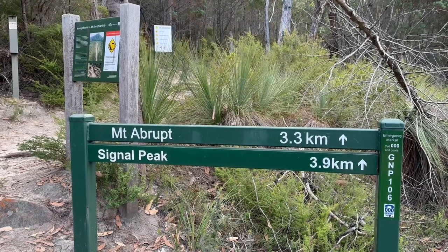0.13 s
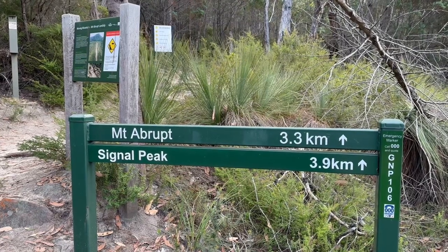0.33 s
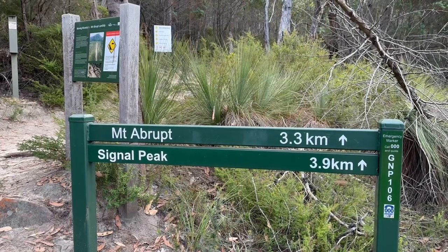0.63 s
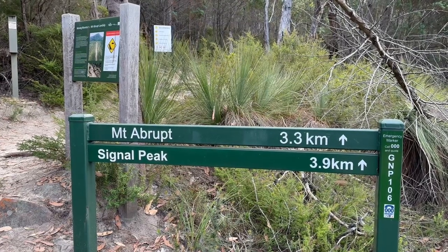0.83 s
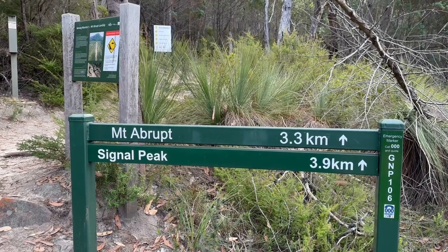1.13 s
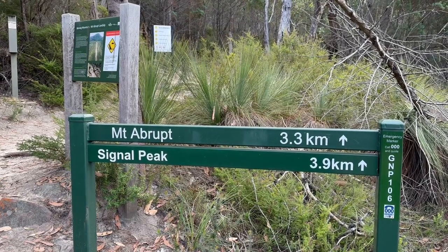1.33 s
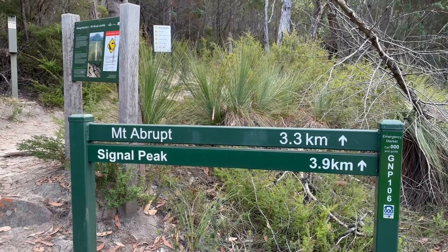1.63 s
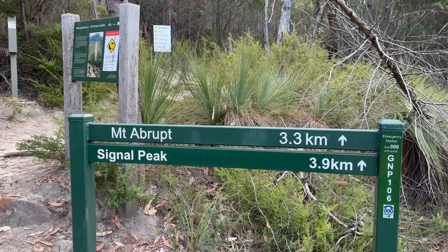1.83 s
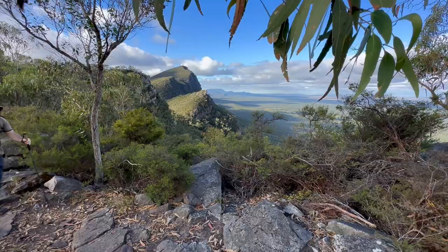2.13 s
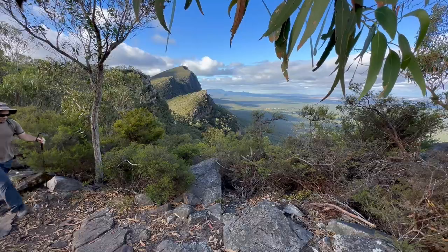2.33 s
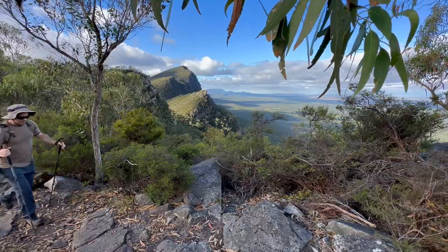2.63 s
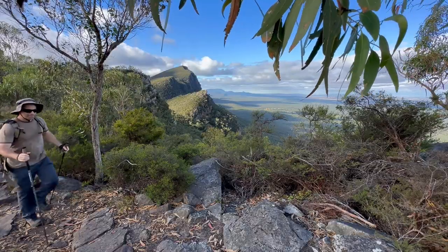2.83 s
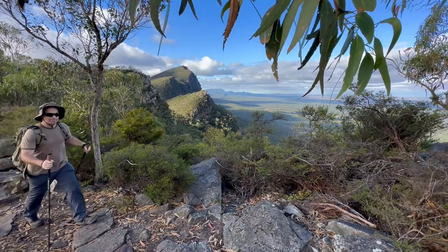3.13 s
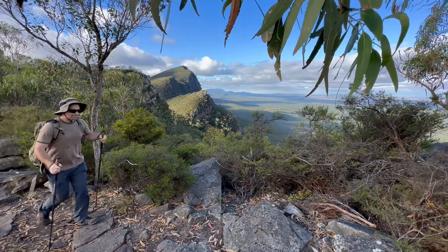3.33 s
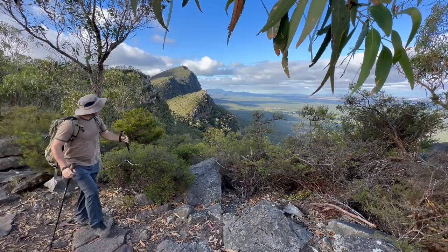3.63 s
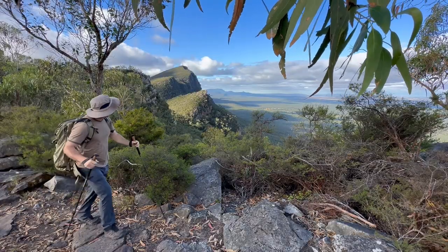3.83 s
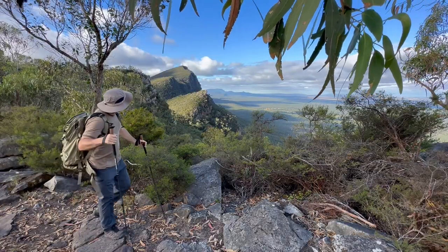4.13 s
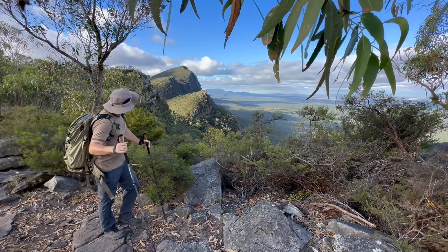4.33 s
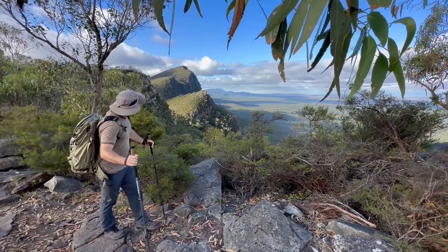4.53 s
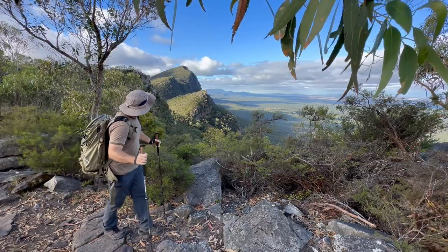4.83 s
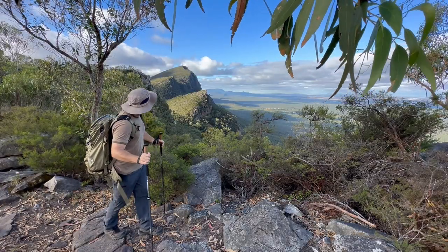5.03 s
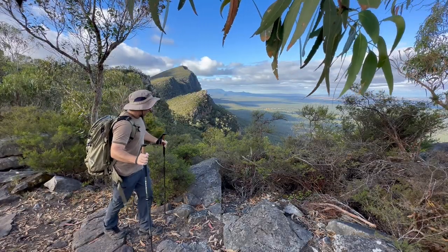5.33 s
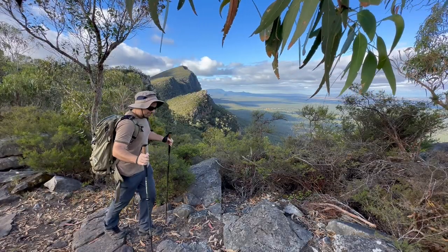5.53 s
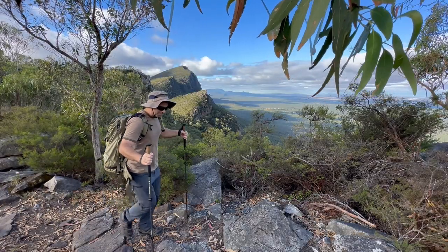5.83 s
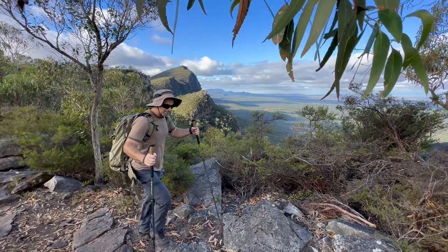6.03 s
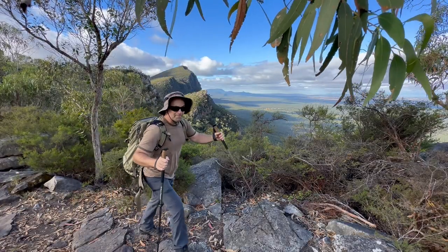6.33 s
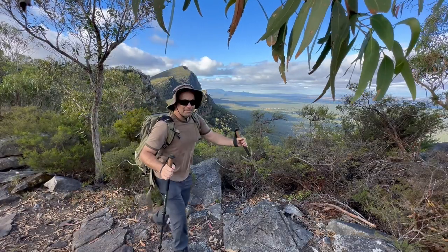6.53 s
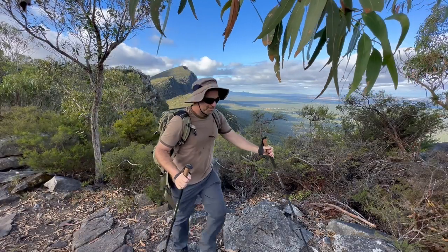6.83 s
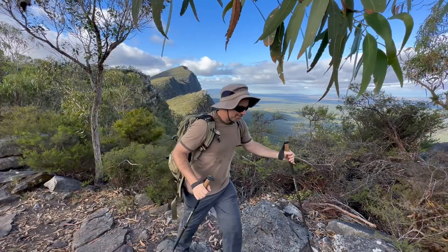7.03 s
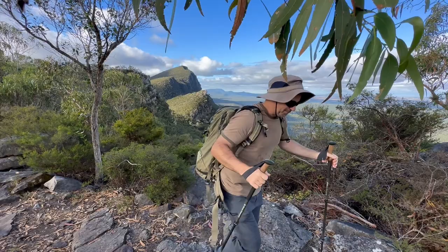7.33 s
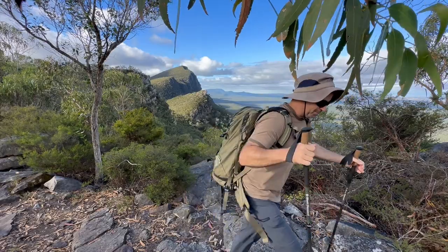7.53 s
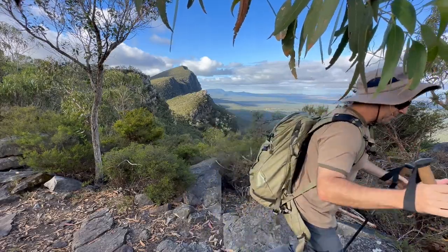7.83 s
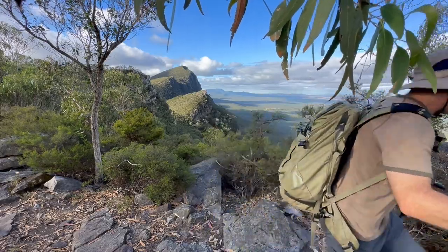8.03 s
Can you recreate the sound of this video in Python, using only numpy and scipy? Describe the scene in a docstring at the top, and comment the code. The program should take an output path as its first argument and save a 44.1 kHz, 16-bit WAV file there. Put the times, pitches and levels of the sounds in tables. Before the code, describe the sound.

Leafy bushland hiss with wind bumps, then a quieter windy ridge where a hiker passes, boots crunching grit and metal pole tips striking stone.

```python
"""Leaves hiss and wind bumps two microphone ports; at 2.21 s the hiss cuts to the quieter air of a rocky ridge.
A hiker passes from left to right: boots thud and scuff on grit, pebbles tick, trousers and pack rustle,
and steel pole tips tap, strike and skitter on the stone. Air, wind, rubbing and grit are shaped noise with
drifting levels; pole shafts and the struck slab are decaying modes; light taps, small stones and snaps
are short band-limited clicks."""
import sys
import numpy as np
from scipy import signal
from scipy.fft import rfft, irfft, next_fast_len
from scipy.io import wavfile
from scipy.ndimage import uniform_filter1d, map_coordinates

SR = 44100
rng = np.random.default_rng(int(sys.argv[2]) if len(sys.argv) > 2 else 0)


def int16_out(signal):
    """Quantize to a 16-bit WAV file."""
    q = np.round(np.clip(np.atleast_2d(signal).T, -1, 1) * 32767)
    wavfile.write(sys.argv[1], SR, q.astype(np.int16))


N = 360297
T = np.arange(N) / SR
TOP_HZ = 15900

# Air: bushland before the cut, ridge after; spectra: f/Hz, density/dB per Hz (relative)
CUT_S = 2.21
BUSH_SPECTRUM = [(25, -20), (75, -6.5), (435, -7), (1310, -18), (2210, -20), (6310, -26.5), (8420, -29.5),
                 (11200, -48.5), (15800, -42)]
RIDGE_SPECTRUM = [(200, -7.5), (720, -7.5), (3000, -13.5), (7600, -17.5), (9000, -14), (11400, -32),
                  (15800, -30)]
# left-right likeness of the air: f/Hz, coherence/1
AIR_COHERENCE = [(180, 0.9), (550, -0.054), (1650, -0.2), (5000, 0.15)]

# breeze swelling to its main crest at 3.87 s, falling, then stirring weakly again: t/s, buffet level/dB
BREEZE = [(0, -76.5), (.82, -65), (1.05, -54), (1.8, -57.5), (2.3, -51), (3.45, -41.5), (3.68, -42.5),
          (3.87, -32.5), (4.08, -37.5), (4.35, -41), (4.88, -56.5), (5.15, -68.5), (5.42, -55), (5.65, -64),
          (6.15, -81), (6.4, -64.5), (7.35, -66.5), (7.55, -74.5), (8.1, -70.5)]
# gusts riding on the breeze: t/s, level/dB
GUSTS = [(.965, -43), (1.19, -48), (1.375, -44), (1.7, -48), (1.94, -48), (2.115, -41), (2.34, -45),
         (4.339, -37), (4.669, -37.5), (4.731, -41.5), (5.291, -55), (5.39, -57), (5.48, -51), (6.235, -65),
         (6.54, -53.5), (6.89, -50), (6.97, -53)]
GUST_S = 0.032  # from crest to 1/e
# wind rumble spectrum: f/Hz, density/dB per Hz (relative)
RUMBLE_SPECTRUM = [(20, -38), (45, 1), (75, 2.5), (130, -7.5), (230, -24), (400, -35.5), (1500, -82)]
# which port takes more wind: t/s, left minus right/dB
WINDWARD = [(.8, 1), (2.15, -2), (2.35, 7.5), (3.3, 6), (5.4, 4.5), (6.2, 0), (8, 9)]

# hardest eddies breaking on the ports: t/s, nominal level/dB, upper edge f/Hz
HARD_EDDIES = [(0.924, -35, 215), (2.134, -29, 106), (2.243, -41, 328), (2.685, -44.5, 328),
               (3.17, -44.5, 910), (3.313, -38, 480), (3.353, -38.5, 360), (3.501, -34.5, 286),
               (3.844, -40.5, 760), (3.857, -42.5, 790), (3.87, -45, 880), (3.883, -41, 800),
               (3.901, -33.5, 850), (3.926, -36, 1340), (3.936, -29, 1200), (3.947, -33, 1110),
               (4.036, -46.5, 900), (4.047, -44, 1000), (4.058, -35.5, 1450), (4.092, -43.5, 840),
               (4.15, -48.5, 850), (4.313, -54, 800)]
EDDY_CYCLES = 2.33  # sigma of the burst, in cycles of its upper edge
CAVITY_HZ, CAVITY_WIDTH_HZ = 970, 210  # port resonance: centre, half-width
LESSER_EDDY_DB, LESSER_EDDY_SCATTER_DB = -5, 1.5  # against the breeze
# upper edge at the breeze's crest; drop of the breeze that lowers it an octave
LESSER_EDDY_EDGE_HZ, LESSER_EDDY_OCTAVE_DB = 380, 30

# hiker's way across: t/s, lead of the left port/ms, left minus right/dB
PATH = [(3, .33, 3), (4.6, 0.16, 2.5), (6.3, 0.17, 3.5), (7.8, -0.11, -2), (8.15, -0.2, -4)]
# treble balance of the near sounds, lift near 9.4 kHz, dip near 11.4 kHz: f/Hz, gain/dB
NEAR_TREBLE = [(6500, 1), (7800, -1), (9400, 6), (10200, -1), (11400, -14.5), (13300, -7), (15500, -7)]
# left-right likeness of the near sounds: f/Hz, coherence/1
NEAR_COHERENCE = [(1000, 0.65), (5000, 0.39), (12000, 0.091)]

# swishes as a limb swings: t/s, level/dB, time from crest to 1/e /s
SWISHES = [(5.77, -73, .08), (6.39, -66, .08), (6.72, -65.5, .075), (6.98, -65.5, .03), (7.15, -62, 0.067),
           (7.36, -60.5, 0.098), (7.75, -59.5, .075), (8.0, -58.5, 0.15)]
# pack rustle between swings: t/s, level/dB
PACK = [(5.4, -100), (5.7, -76), (8.1, -72)]
# rubbing fabric spectrum: f/Hz, density/dB per Hz (relative)
FABRIC_SPECTRUM = [(100, 0), (250, 6), (700, 2), (2400, -1), (4200, -7.5), (7500, -5.5), (15500, -8.5)]

# coarse grains in a crunch: size scatter, middle pitch, cycles to -60 dB; level against the fine ones
GRAIN_SCATTER_DB, GRAIN_HZ, GRAIN_CYCLES = 3.5, 4000, 7
GRAIN_DB = -9

# light pole taps, pebbles and grit ticking: t/s, nominal peak/dB, centre f/Hz
TICKS = [(2.3997, -37, 8400), (2.881, -47, 3580), (2.955, -33.5, 3460), (3.547, -37.5, 1990),
         (3.8536, -30.5, 11900), (4.6305, -53, 7050), (4.6575, -40.5, 9500), (4.8105, -44, 8950),
         (5.921, -39.5, 6950), (6.304, -39.5, 2880), (6.3568, -30.5, 1940), (6.4593, -30, 10580),
         (6.958, -43, 9000), (7.1435, -32.5, 2600), (7.7701, -30, 2170), (7.7909, -31, 2300),
         (7.812, -36.5, 6200), (7.878, -41, 3130)]
CLICK_T60_S, SCATTER_T60_S, SCATTER_DB = 0.01, 0.17, -14  # click, then scatter from the ground
# pole tip skittering after the hardest strike: first contact, nominal peak, centre
SKITTER_AT_S, SKITTER_DB, SKITTER_HZ = 4.5903, -29, 3000
GAP_S, GAP_RATIO = 0.0994, 0.8  # first gap; each next gap over the last
SKITTER_LOSS_DB, SKITTER_BRIGHTEN_HZ = 3, 3680  # from contact to contact
# stray snaps of grit and fabric: nominal peak over the friction, its scatter; centre, its spread
SNAP_DB, SNAP_SCATTER_DB, SNAP_HZ, SNAP_OCTAVES = 12.5, 2.2, 4060, 1.16

# boots landing: t/s, nominal peak/dB, upper edge f/Hz
STEPS = [(4.682, -47.5, 925), (6.339, -50, 596), (7.019, -51, 810), (7.056, -47.5, 690), (7.654, -44, 360)]
# boots rolling over the ground: t/s, grit level/dB, scrape length/s, dry litter level/dB
FOOTFALLS = [(2.521, -63, 0.025, -64.5), (2.862, -56.5, .013, -65), (2.96, -54, .01, -76.5),
             (3.211, -67, 0.052, -64), (3.442, -70.5, 0.026, -69), (3.88, -57.5, .009, -65.5),
             (4.274, -62, 0.022, -75.5), (5.711, -76.5, 0.028, -72), (6.475, -63, 0.03, -76.5),
             (6.781, -57, 0.023, -86.5), (7.191, -58, .014, -72), (7.422, -53.5, 0.0055, -73),
             (7.8, -56.5, 0.014, -69), (8.163, -47.5, 0.006, -71.5)]
LITTER_S = 0.1  # leaves give way more slowly than grit
# ground spectra: f/Hz, density/dB per Hz (relative)
GRIT_SPECTRUM = [(200, -1), (800, 4.5), (2800, -1), (9000, -2.5), (15500, 0)]
LITTER_SPECTRUM = [(300, 16), (1000, 4.5), (6000, -0.5), (9000, -11), (15500, -20)]

# pole tips on rock: t/s, pole, crack/dB, shaft ring/dB, rock knock/dB, tail/dB
POLES = [(3.033, "right", -39, -43, -71, -77), (3.0417, "right", -39, -36, -69, -52.5),
         (3.7379, "left", -29.5, -39.5, -65, -45.5), (4.5461, "left", -20.5, -31, -20, -37.5)]
# tip crack and its tail, spectrum: f/Hz, density/dB per Hz (relative)
CRACK_SPECTRUM = [(150, -10), (500, -3.5), (1800, -1.5), (7000, 1), (15500, -6)]
# shaft modes: f/Hz, level/dB
RIGHT_SHAFT = [(2700, -9), (4170, 0.5), (4700, -8), (5760, -3), (6090, 0), (9200, -9)]
LEFT_SHAFT = [(2780, -4.5), (3545, -5.5), (3950, 2), (4490, 2.5), (4900, -3.5), (5990, -4), (6385, -11.5),
              (6750, -2.5), (9370, -10)]
SHAFT_T60_S = 0.09
# struck slab modes: f/Hz, level/dB, t60/s
SLAB = [(430, -9, 0.04), (675, -4, 0.055), (830, -2, 0.027), (1010, 0, .02), (1250, -4, 0.016),
        (1720, -8, .035), (2030, -8, 0.035)]
CRUSH_DB, CRUSH_HZ, CRUSH_T60_S = -4, 1550, 0.028  # grit under the tip: against slab, upper edge, decay


def amp(db):
    """Decibels to gain."""
    return np.exp(np.asarray(db) * (np.log(10) / 20))


def unit(x):
    """Scaled to rms 1."""
    return x / np.sqrt(np.mean(x ** 2) + 1e-20)


def along(points, hz):
    """(Hz, value) points read on a log frequency axis."""
    f, v = np.transpose(points)
    return np.interp(np.log(hz + 1), np.log(f + 1), v)


def curves(rows, at=T):
    """Each column after the time, joined by straight lines."""
    s, *cols = np.transpose(rows)
    return [np.interp(at, s, c) for c in cols]


def wobble(rate_hz, size=N):
    """Smooth random curve with rate_hz knots a second."""
    knots = rng.standard_normal(int(size * rate_hz / SR) + 4)
    fine = np.arange(len(knots) * 6) / 6
    return np.interp(T[:size] * rate_hz, fine, map_coordinates(knots, [fine]))


def filtered(x, response):
    """Zero-phase filter; response maps Hz to gain."""
    size = x.shape[-1]
    m = next_fast_len(size + size // 32, real=True)
    gain = response(np.fft.rfftfreq(m, 1 / SR)).astype(np.float32)
    return irfft(rfft(x.astype(np.float32), m) * gain, m)[..., :size].astype(float)


def coloured(x, spectrum):
    """x given a spectrum, at rms 1."""
    return unit(filtered(x, lambda hz: amp(along(spectrum, hz))))


def noise(coherence, size=N):
    """White stereo noise; mid and side shares set the likeness of the channels."""
    def shares(hz):
        alike = np.clip(along(coherence, hz), -1, 1)
        return np.sqrt((1 + np.outer([1, -1], alike)) / 2)

    mid, side = filtered(rng.standard_normal((2, size)), shares)
    return np.array([mid + side, mid - side])


def panned(x, balance_db):
    """Half of the level difference goes to each side."""
    return np.array([x[0] * amp(balance_db / 2), x[1] * amp(-balance_db / 2)])


def add(track, s, sound):
    """Mixes a sound into the track at time s."""
    part = track[:, max(round(s * SR), 0):][:, :sound.shape[-1]]
    part += sound[..., :part.shape[-1]]


def scattered(likelihood, count):
    """Random moments that crowd where the likelihood is high."""
    total = np.cumsum(likelihood)
    return np.interp((np.arange(count) + rng.random(count)) / count, total / total[-1], T)


def swells(rows):
    """Gaussian swells that rise and fall alike; overlapping ones add in power."""
    power = np.zeros((1, N))
    for s, db, length_s in rows:
        t = np.arange(-3 * length_s, 3 * length_s, 1 / SR)
        add(power, s + t[0], (amp(db) * np.exp(-(t / length_s) ** 2)) ** 2)
    return np.sqrt(power[0])


def strokes(rows):
    """Pressure of sliding soles: each stroke builds quickly and eases off more slowly."""
    out = np.zeros((1, N))
    for s, db, length_s in rows:
        t = np.arange(-3 * length_s, 6 * length_s, 1 / SR)
        shape = np.where(t < 0, np.exp(-(t / length_s) ** 2), 1 / np.cosh(t / length_s))
        add(out, s + t[0], amp(db) * shape)
    return out


def patchy(x, patch_db):
    """The colour drifts in patches some hundred Hz wide and some tens of ms long."""
    z = signal.stft(x, nperseg=512)[2]
    field = rng.standard_normal(z.shape[1:])
    field = uniform_filter1d(uniform_filter1d(field, size=5, axis=0), size=9, axis=1)
    return signal.istft(z * amp(patch_db * unit(field)), nperseg=512)[1][:, :N]


def ring(modes, t, scatter_db, waver):
    """Modes struck together; strength and phase differ by side, and a loose contact blurs each line."""
    hz, db, t60_s = np.transpose(modes)[:, :, None]
    strength = amp(db + scatter_db * rng.standard_normal((2, len(modes), 1)))
    phase = hz / 4000 * rng.standard_normal((2, len(modes), 1))
    drift = waver * np.cumsum(rng.standard_normal((len(modes), len(t))), axis=1) / np.sqrt(SR)
    lines = strength * amp(-60 * t / t60_s) * np.sin(2 * np.pi * hz * t + phase + drift)
    return lines.sum(axis=1) / np.linalg.norm(amp(db))


def air():
    """Leaves hiss steadily in the bushland; the ridge is stiller."""
    bush = panned(coloured(noise(AIR_COHERENCE), BUSH_SPECTRUM), balance_db=0.7) * amp(-65.5)
    ridge = panned(coloured(noise(AIR_COHERENCE), RIDGE_SPECTRUM), balance_db=3.5) * amp(-74.0)
    on_ridge = np.clip((T - CUT_S) / 0.013 + 0.5, 0, 1)
    return bush * (1 - on_ridge) + ridge * on_ridge


def wind():
    """Turbulence presses on each port in lumps; a stronger breeze shifts the balance from rumble to flutter."""
    breeze_db, = curves(BREEZE)
    breeze = amp(breeze_db + 0.29 * wobble(13))
    level = np.hypot(breeze, swells([(s, db, GUST_S) for s, db in GUSTS]))
    # half shared, half each port's own
    lumps = (wobble(25) + np.array([wobble(35), wobble(35)])) / np.sqrt(2)
    rumble = coloured(noise([(60, 0.13), (300, 0.11)]), RUMBLE_SPECTRUM)
    rumble = unit(rumble * amp(2.3 * lumps))
    flutter_spectrum = [(90, -6.5), (170, 4.5), (300, -10.5), (650, -33), (3000, -84.5)]
    flutter = coloured(rng.standard_normal((2, N)), flutter_spectrum)
    flutter = unit(flutter * amp(3.3 * lumps))
    flutter_db = np.minimum(-8.0 + 0.52 * (breeze_db + 40.5), -7)
    rumble_db = -0.13 * np.maximum(breeze_db + 53, 0)
    return level * (amp(rumble_db) * rumble + amp(flutter_db) * flutter)


def lesser_eddies(count):
    """The stronger the breeze, the more often it sheds eddies, and the louder and higher they are."""
    breeze_db, = curves(BREEZE)
    s = scattered(amp(breeze_db), count)
    db, = curves(BREEZE, at=s)
    edge_hz = LESSER_EDDY_EDGE_HZ * 2 ** ((db - breeze_db.max()) / LESSER_EDDY_OCTAVE_DB)
    level_db = db + LESSER_EDDY_DB + LESSER_EDDY_SCATTER_DB * rng.standard_normal(count)
    return list(zip(s, level_db, edge_hz))


def eddies():
    """Single eddies flap against the ports: short dull bursts; the fastest excite the port cavity."""
    out, t = np.zeros((2, N)), np.arange(SR // 8) / SR - 1 / 16
    for s, db, edge_hz in HARD_EDDIES + lesser_eddies(count=26):
        def response(hz):
            cavity = 1 / np.hypot(1, hz / 650) + 0.5 / (1 + ((hz - CAVITY_HZ) / CAVITY_WIDTH_HZ) ** 2)
            return cavity * hz / (hz + 60) / np.sqrt(1 + (hz / edge_hz) ** 9)

        swell = np.exp(-(t * edge_hz / EDDY_CYCLES) ** 2 / 2)
        puff = filtered(noise([(300, 0.083)], size=len(t)) * swell, response)
        add(out, s + t[0], unit(puff) * np.sqrt(np.mean(swell ** 2)) * amp(db - 3.5))
    return out


def coarse_grains(count):
    """Larger grains crack one by one, each with a few cycles of its own pitch."""
    t = T[:SR // 100]
    at = rng.integers(N - len(t), size=(count, 1)) + np.arange(len(t))
    pitch, size, side_db = rng.standard_normal((3, count, 1))
    hz = np.minimum(GRAIN_HZ * 2 ** pitch, TOP_HZ)
    envelope = amp(GRAIN_SCATTER_DB * np.minimum(size, 2) - 60 * t * hz / GRAIN_CYCLES)
    grains = envelope * np.sin(2 * np.pi * hz * t)
    grains = grains * np.sqrt(hz / GRAIN_HZ)  # a longer-lived grain carries no more energy
    pair = panned([grains, grains], side_db)
    return unit(np.array([np.bincount(at.ravel(), g.ravel(), N) for g in pair]))


def crunch(grain_db):
    """Countless tiny fractures in clumps, with coarser grains cracking among them."""
    sizes = amp(grain_db * (np.clip(wobble(900), -2.5, 2.5) + wobble(70) / 2))
    fine = unit(patchy(noise(NEAR_COHERENCE) * sizes, patch_db=2.5))
    return fine + amp(GRAIN_DB) * coarse_grains(count=1800)


def rubbing():
    """How hard the fabric rubs: a swish for each swing over the pack's own rustle."""
    pack_db, = curves(PACK)
    return np.hypot(amp(pack_db), swells(SWISHES))


def cloth(rub):
    """Trouser legs swish past each other and stiff pack fabric crinkles: crunching noise scaled by the rub."""
    return rub * coloured(crunch(grain_db=1.5), FABRIC_SPECTRUM)


def skitter(count):
    """The tip skitters: contacts ever sooner, softer and brighter."""
    rows = []
    for k in range(count):
        after_s = GAP_S * np.sum(GAP_RATIO ** np.arange(k))
        peak_db = SKITTER_DB - SKITTER_LOSS_DB * k
        rows.append((SKITTER_AT_S + after_s, peak_db, SKITTER_HZ + SKITTER_BRIGHTEN_HZ * k))
    return rows


def snaps(friction, count):
    """Harder friction sets off more and louder stray snaps."""
    s = scattered(friction, count)
    size, pitch = rng.standard_normal((count, 2)).T
    db = 20 * np.log10(np.interp(s, T, friction)) + SNAP_DB + SNAP_SCATTER_DB * size
    return list(zip(s, db, SNAP_HZ * 2 ** (SNAP_OCTAVES * pitch)))


def ticks(rows):
    """Light pole taps, small stones and snaps click, each in its own broad band, with a faint ground scatter."""
    out, t = np.zeros((2, N)), np.arange(SR // 6) / SR
    decay = amp(-1 - 60 * t / CLICK_T60_S) + amp(SCATTER_DB - 60 * t / SCATTER_T60_S)
    for s, peak_db, centre_hz in rows:
        def band(hz):
            return amp(np.maximum(-3.5 * np.log2((hz + 1) / centre_hz) ** 2, -120))

        click = unit(filtered(noise(NEAR_COHERENCE, size=len(t)), band))
        add(out, s, amp(peak_db - 11.5) * click * decay)  # noise peaks exceed its rms
    return out


def sole_pressure():
    """How hard the boots scrape on grit, and how hard they press on litter."""
    scrape = strokes([(s, grit_db, length_s) for s, grit_db, length_s, _ in FOOTFALLS])
    press = strokes([(s, litter_db, LITTER_S) for s, _, _, litter_db in FOOTFALLS])
    return scrape, press


def boots(scrape, press):
    """Rubber soles land with a dull thud and grind grit and dry litter against the rock."""
    out, t = np.zeros((2, N)), np.arange(SR // 6) / SR
    for s, peak_db, edge_hz in STEPS:
        def dull(hz):
            return hz / (hz + 300) / (1 + (hz / edge_hz) ** 4)

        thud = unit(filtered(noise(NEAR_COHERENCE, size=len(t)), dull))
        add(out, s, amp(peak_db - 4.5) * thud * amp(-60 * t / 0.076) * (1 - np.exp(-t / 0.00043)))
    grains = crunch(grain_db=2.0)
    return out + scrape * coloured(grains, GRIT_SPECTRUM) + press * coloured(grains, LITTER_SPECTRUM)


def slab_knock(t):
    """The slab rings in short modes; grit crushed under the tip fills the knock."""
    slab = ring(SLAB, t, scatter_db=1.5, waver=12)
    crush = unit(filtered(rng.standard_normal(len(t)), lambda hz: 1 / (1 + (hz / CRUSH_HZ) ** 6)))
    knock = slab / np.sqrt(2) + crush * amp(CRUSH_DB - 60 * t / CRUSH_T60_S)
    # a small slab radiates little bass
    return signal.sosfilt(signal.butter(2, 420, "high", fs=SR, output="sos"), knock)


def poles():
    """The steel tip cracks on stone, the shaft rings, the slab knocks, and nearby rocks scatter the sound."""
    out, t = np.zeros((2, N)), np.arange(SR // 3) / SR
    for s, pole, crack_db, shaft_db, knock_db, tail_db in POLES:
        crack = amp(crack_db - 60 * t / 0.031) * coloured(noise(NEAR_COHERENCE, size=len(t)), CRACK_SPECTRUM)
        scatter = amp(-60 * t / 0.2) + amp(-26.5 - 60 * t / 0.83)
        scatter = scatter * amp(1.5 * wobble(400, size=len(t)))  # uneven rocks, uneven echoes
        tail = amp(tail_db) * scatter * coloured(rng.standard_normal((2, len(t))), CRACK_SPECTRUM)
        shaft_modes = LEFT_SHAFT if pole == "left" else RIGHT_SHAFT
        modes = [(hz, db, SHAFT_T60_S) for hz, db in shaft_modes]
        shaft = amp(shaft_db) * ring(modes, t, scatter_db=2, waver=20)
        add(out, s, (crack + tail + shaft) * (1 - np.exp(-t / 0.001)))
        # the weight on the pole reaches the slab just after the tip touches
        add(out, s + 0.0012, panned(amp(knock_db) * slab_knock(t), balance_db=5))
    return out


def placed(x):
    """The port nearer the hiker hears the sound earlier and louder; a shared curve shapes the treble."""
    lead_ms, balance_db = curves(PATH)
    shift = lead_ms * SR / 1000 / 2  # samples, half to each side
    x = filtered(x, lambda hz: amp(along(NEAR_TREBLE, hz)))
    pair = [map_coordinates(side, [np.arange(N) + way * shift], order=3) for side, way in zip(x, (1, -1))]
    return panned(pair, balance_db)


def scene():
    """The hiker amid air and wind."""
    windward_db, = curves(WINDWARD)
    blowing = panned(wind() + eddies(), windward_db)
    scrape, press = sole_pressure()
    rub = rubbing()
    stray = snaps((scrape + press)[0] + rub, count=20)
    clicks = ticks(TICKS + skitter(count=3) + stray)
    hiker = placed(cloth(rub) + clicks + boots(scrape, press) + poles())
    return air() + blowing + hiker


def record(dry):
    """A steep low-pass at TOP_HZ: the microphone's band limit."""
    return filtered(dry, lambda hz: 1 / (1 + (hz / TOP_HZ) ** 120))


dry = scene()
out = record(dry)
int16_out(out)
```